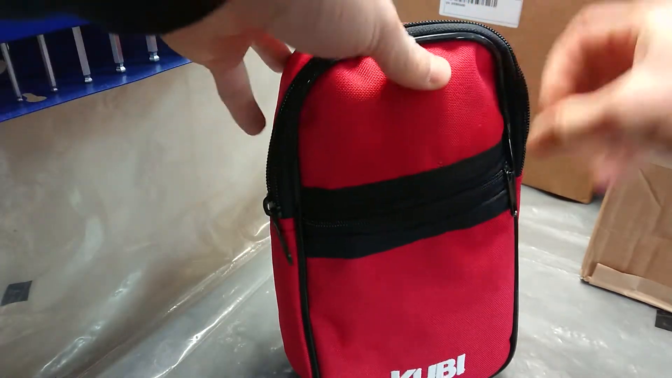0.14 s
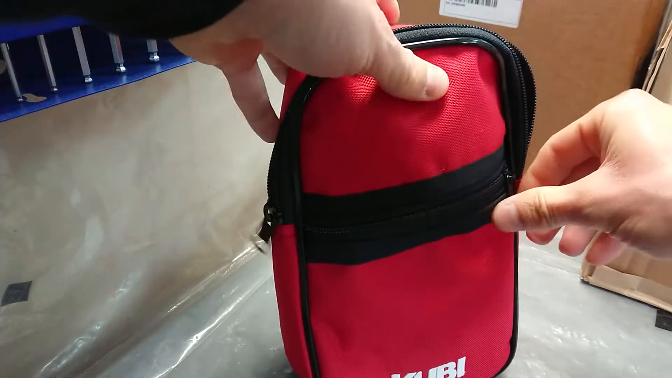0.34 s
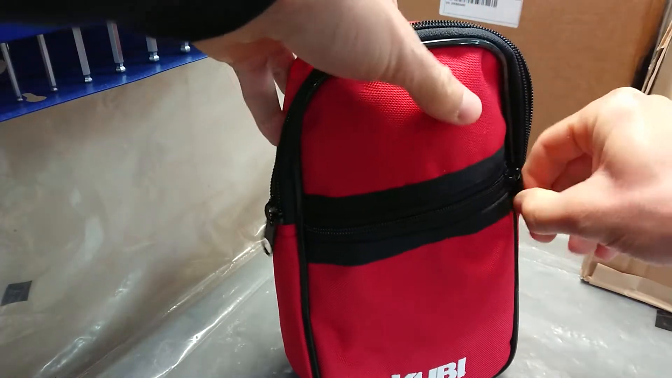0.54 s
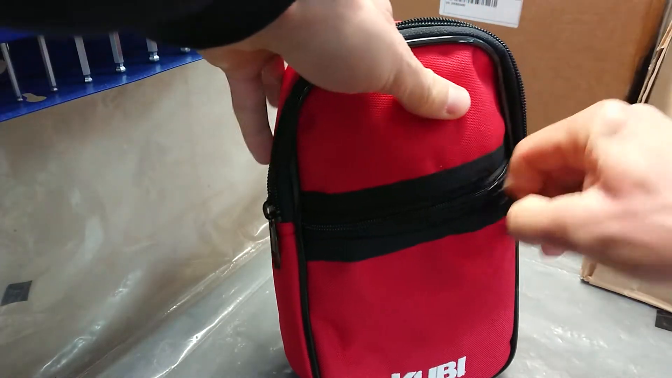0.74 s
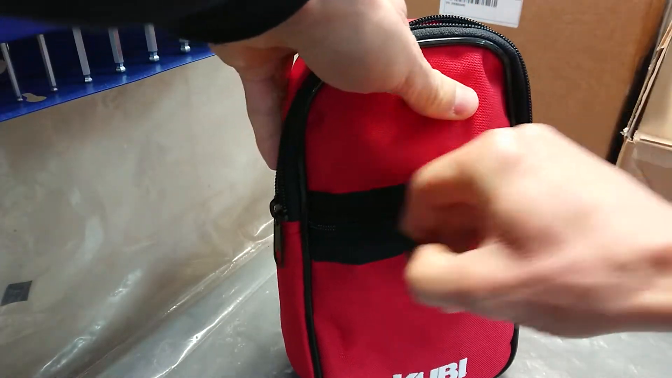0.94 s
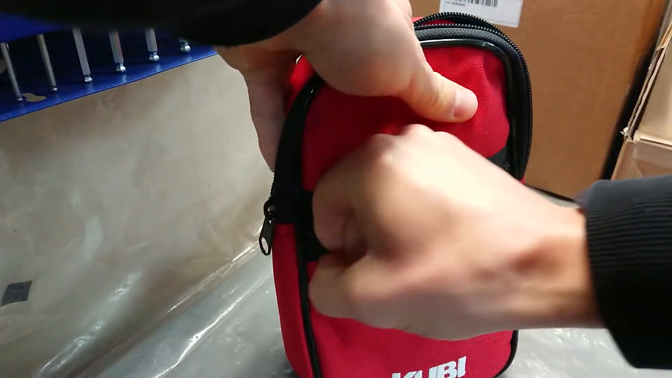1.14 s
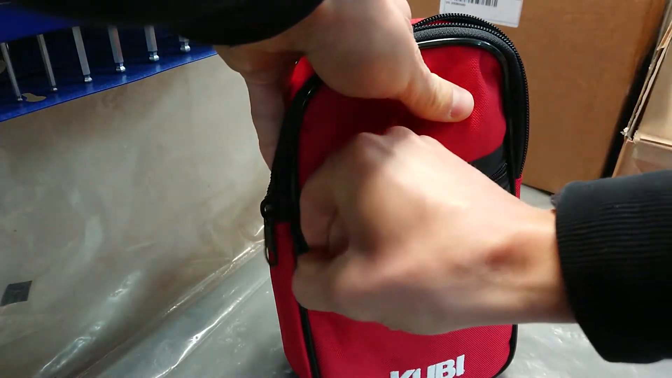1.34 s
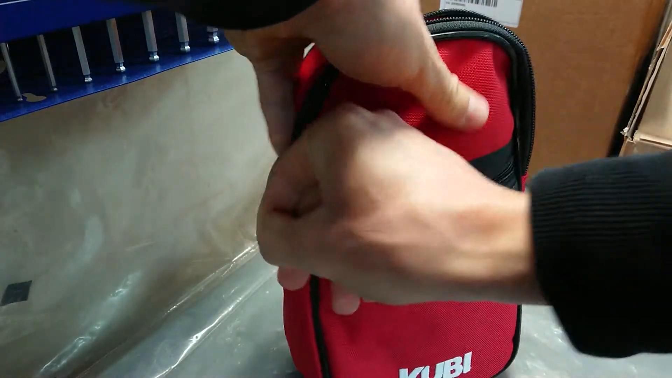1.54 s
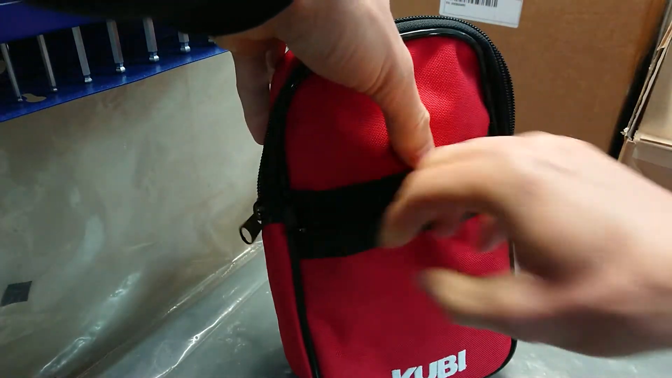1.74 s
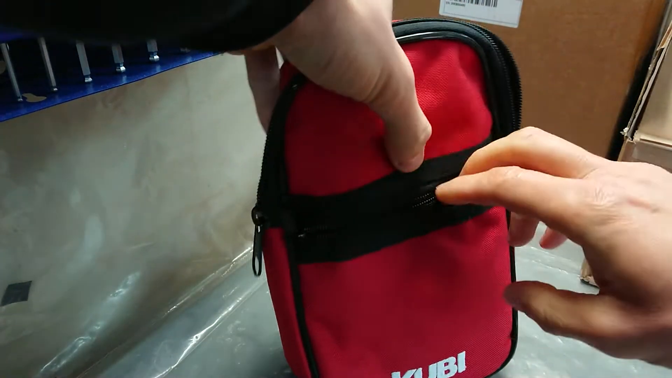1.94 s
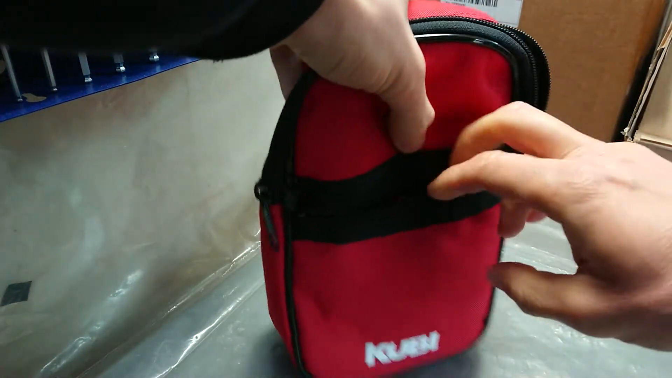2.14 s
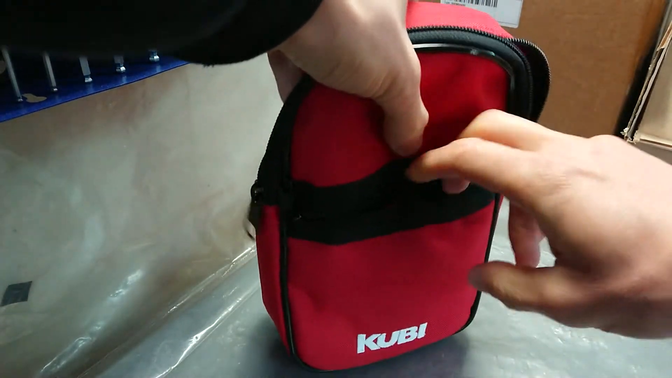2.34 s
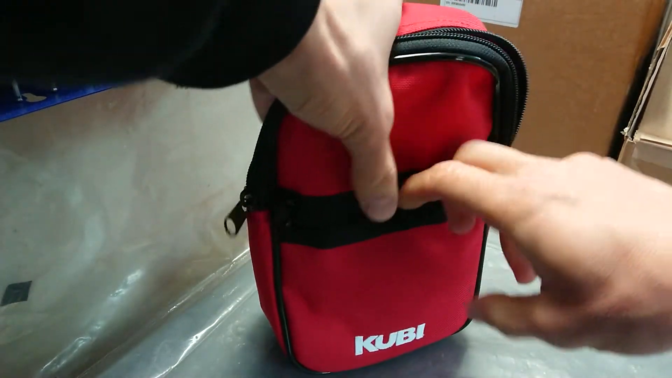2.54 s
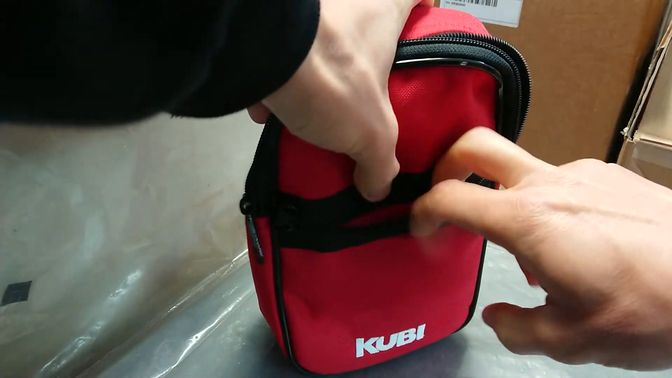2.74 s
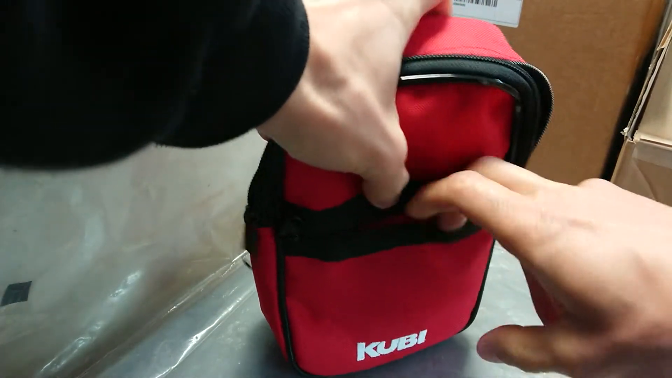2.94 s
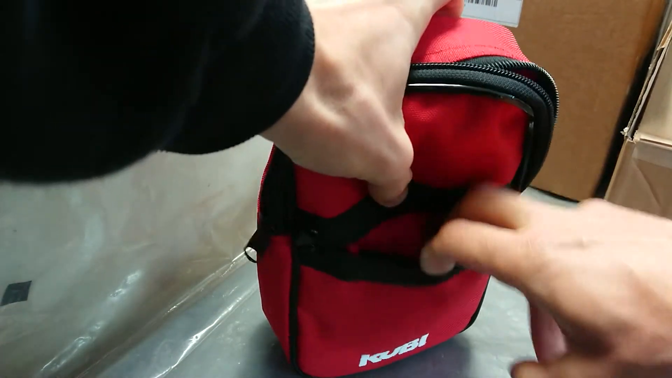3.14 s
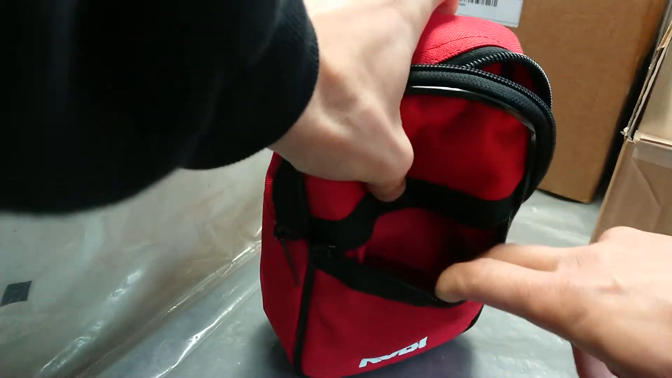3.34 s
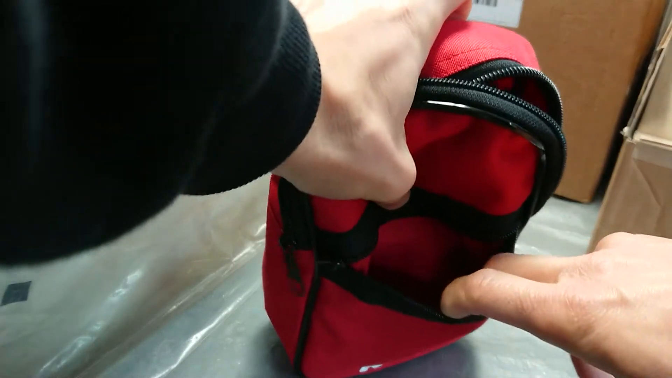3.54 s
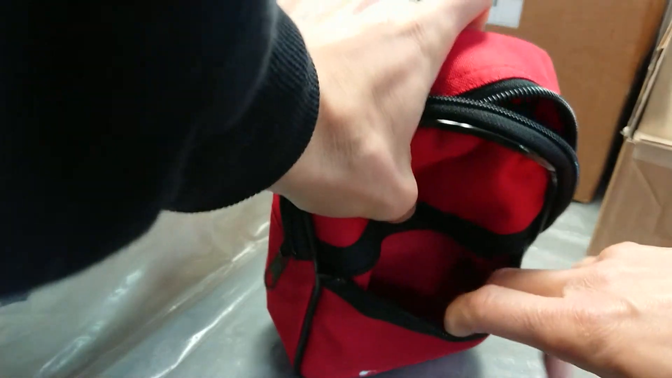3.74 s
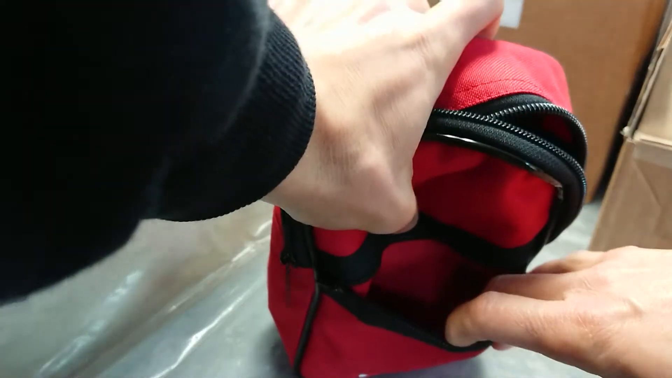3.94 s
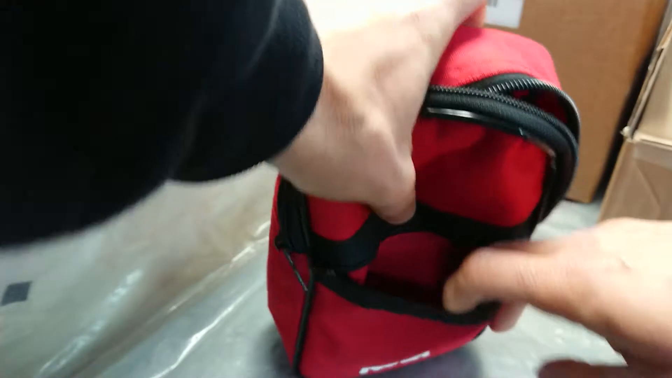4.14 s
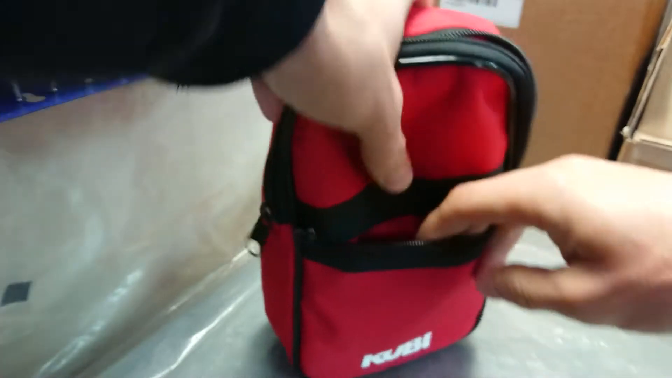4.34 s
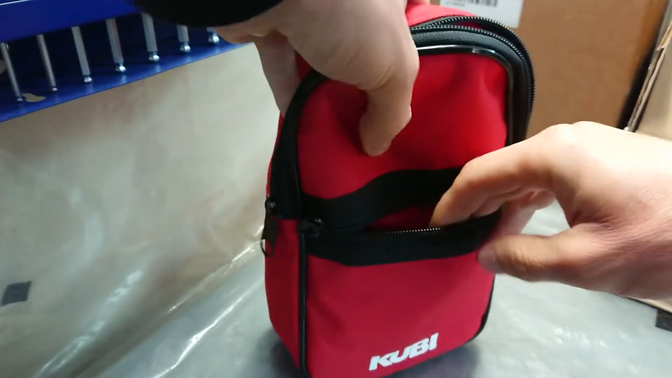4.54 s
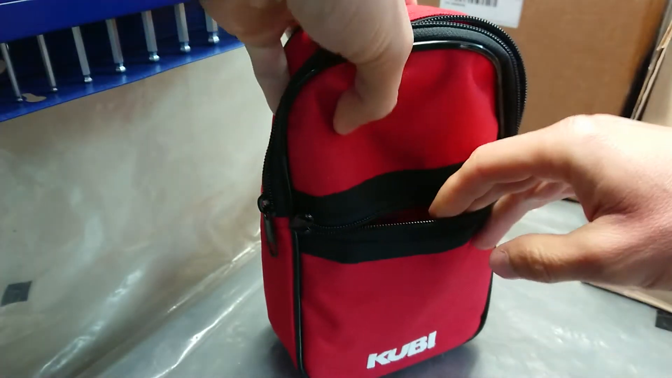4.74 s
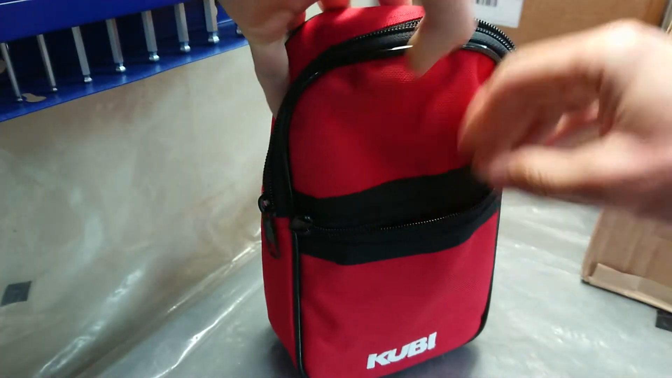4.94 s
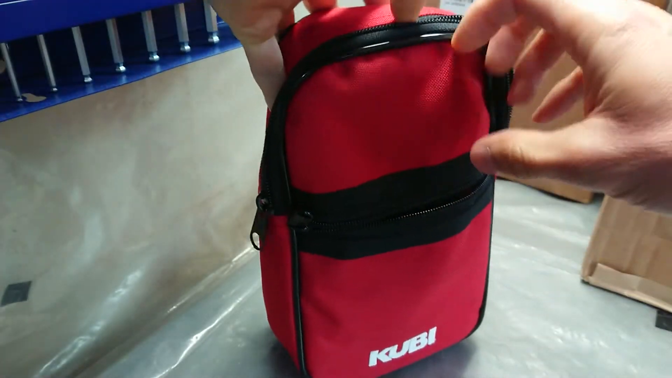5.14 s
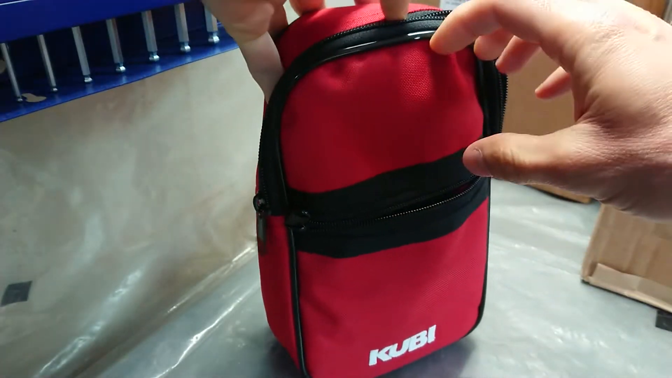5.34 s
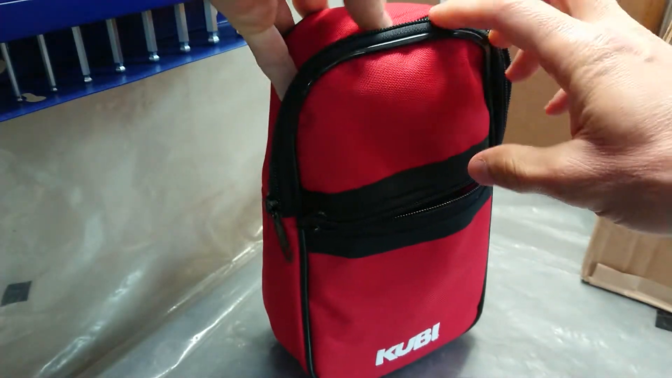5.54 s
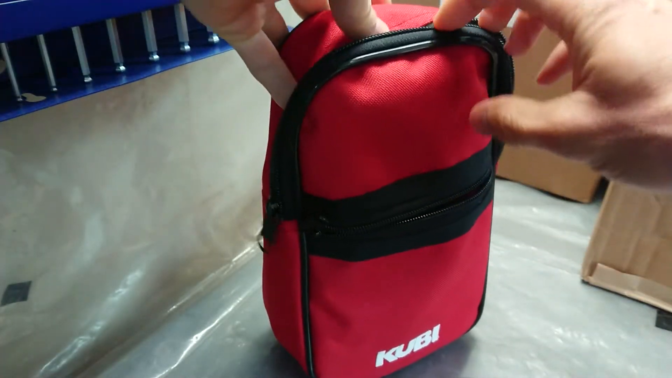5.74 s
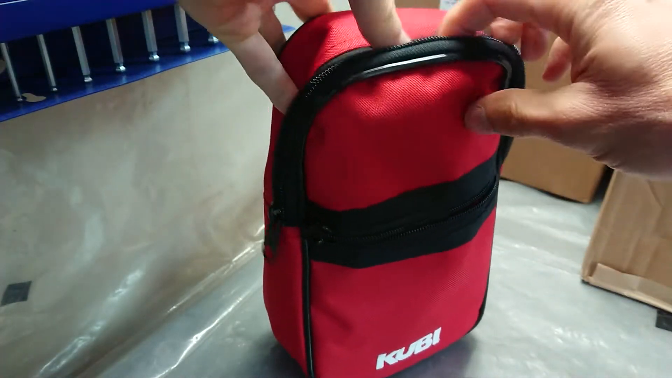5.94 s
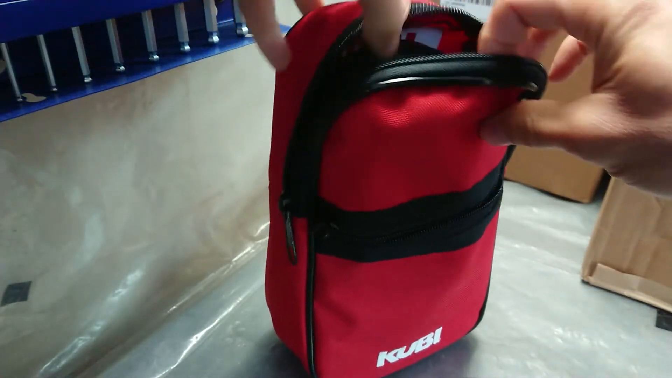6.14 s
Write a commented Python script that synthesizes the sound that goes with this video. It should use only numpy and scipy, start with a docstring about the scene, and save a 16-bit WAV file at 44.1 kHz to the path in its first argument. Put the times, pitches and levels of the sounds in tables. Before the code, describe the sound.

Close by, in a quiet small-sounding room with a low steady murmur, a hand brushes stiff nylon at 0 s, with a tiny tick and soft bump before 0.3 s and faint rustles to 0.7. At about 0.72 s a zip starts with a small snap and runs open until 1.25, a dense, bright rasp over a hollow drumming of taut cloth, slowing to separate ticks at the end. Around 1.46 s comes the loudest event: a tight cluster of metallic clacks with a very short bright ring and a dull thump, then small tab clinks to 1.6. Light rustling leads to busy handling from 2.1 to 3.5 s: swishes, creaks, crisp snaps and soft bumps, a strong snap near 3.04. It quiets around 3.6-4.1, then gentle swishing continues to 5, followed by sparse touches, a faint tick, and light brushing and a thin rub after 6 s.

```python
"""The front zip of a small nylon pouch is pulled open in one run, close by on a bench: each tooth ticks,
scrapes and drums on the cloth panel. The metal slider and its tab then clink at the end of the track, as
decaying tones with a burst of noise. Fingers spread the pocket: shaped noise makes the stiff cloth swish and
creak, cracks with a crumble of noise make it snap, and short pushes bump the pouch softly in a quiet room."""
import sys
import numpy as np
from scipy import signal
from scipy.fft import rfft, irfft, next_fast_len
from scipy.io import wavfile
from scipy.ndimage import uniform_filter1d

SR = 44100
rng = np.random.default_rng(int(sys.argv[2]) if len(sys.argv) > 2 else 0)


def dump_mix(stems):
    """Bounce the given channels to the path in sys.argv[1] as a 16-bit WAV at rate SR."""
    frames = np.atleast_2d(stems).T  # one column per channel
    limited = np.clip(frames, -1, 1)  # hard clip at full scale
    pcm = np.round(limited * 32767).astype(np.int16)
    wavfile.write(sys.argv[1], SR, pcm)


N = 272979
T = np.arange(N) / SR  # time of every sample, in seconds

# Snaps of stiff cloth, zip teeth and tab; each also kicks the pouch. Each row: time in seconds, reference
# peak level in dB, treble in dB against that level, time to die away by 60 dB in seconds.
SNAPS = [(0.109, -46.5, -9, 0.025), (.723, -35, -24, .014), (0.738, -31, -16, 0.014),
         (1.17, -38.5, -3, 0.01), (1.342, -33.5, -12.5, 0.0058), (1.486, -22, -25, 0.017),
         (1.893, -39.5, -2.5, 0.029), (2.171, -27, -15, 0.019), (2.225, -30, -2, 0.045),
         (2.378, -42, -2, 0.029), (2.461, -30.5, -9, 0.048), (2.506, -42, -3, 0.022),
         (2.556, -33.5, -4.5, 0.028), (2.709, -27, -22, 0.024), (2.795, -30, -7, 0.039),
         (2.91, -28.5, -9.5, 0.041), (3.035, -20, -19, 0.0069), (3.047, -32, -12, 0.026),
         (3.182, -29.5, -27, 0.017), (3.244, -28, -15.5, 0.018), (3.352, -27, -17.5, 0.023),
         (3.496, -37, -14, 0.03), (3.709, -34, -17.5, 0.012), (3.84, -37, -14.5, 0.012),
         (4.135, -44.5, -29, 0.021), (4.198, -37, -12, 0.015), (4.274, -41.5, -23, 0.022),
         (4.369, -36.5, -8.5, 0.039), (4.63, -41.5, -29, 0.03), (5.183, -39.5, -6, 0.0081),
         (5.465, -40, -19, 0.0049), (5.987, -40, -13, .04)]


def undb(db):
    """Turn decibels into a gain."""
    return 10 ** (np.asarray(db) / 20)


def unit(x):
    """Scale a sound to an rms of 1."""
    return x / np.sqrt(np.mean(x ** 2))


def curves(table):
    """Draw each column of a table as a control curve, sample by sample."""
    seconds, *columns = np.transpose(table)
    return [np.interp(T, seconds, column) for column in columns]


def colour(x, points):
    """Shape the spectrum through (Hz, dB) points with a filter that never answers ahead of its input."""
    size = next_fast_len(x.shape[-1] + 2048, real=True)
    hz, db = np.transpose(points)
    bins = np.fft.rfftfreq(size, 1 / SR)
    gain = undb(np.interp(np.log(bins + 1), np.log(hz), db))
    # folding the cepstrum gives the filter its minimum phase
    cepstrum = irfft(np.log(gain), size)
    cepstrum[1:size // 2] *= 2
    cepstrum[size // 2 + 1:] = 0
    response = np.exp(rfft(cepstrum))
    return irfft(rfft(x, size) * response, size)[..., :x.shape[-1]]


def noise(count, split_hz=900):
    """Make white noise at two ports: alike in the bass, unrelated in the treble."""
    mid, side = rng.standard_normal((2, count))
    side = signal.sosfilt(signal.butter(1, split_hz, "high", fs=SR, output="sos"), side)
    return unit(np.array([mid + side, mid - side]))


def walk(rate):
    """Wander smoothly at random, with this many knots per second and a spread near 1."""
    knots = rng.standard_normal(4096)
    return 1.2 * np.interp(T * rate, np.arange(len(knots)), knots)


def ring(modes, t, spread=0):
    """Sum the decaying tones of a struck object; spread (0-1) scatters their starting phases."""
    tones = 0
    for hz, t60, db in modes:
        phase = 2 * np.pi * (hz * t + spread * rng.random())
        tones = tones + undb(db - 60 * t / t60) * np.cos(phase)
    return tones


def resonate(x, hz, q):
    """Pass a sound through one broad resonance with gain 1 at its centre."""
    return signal.lfilter(*signal.iirpeak(min(hz, SR / 3), max(q, 1), fs=SR), x)


def fade(t, t60):
    """Decay exponentially, by 60 dB in t60 seconds."""
    return np.exp(-np.log(1000) * t / max(t60, 1e-3))


def add(out, s, sound, db):
    """Place a sound at a time in seconds with a given peak level."""
    start = int(s * SR)
    part = sound[..., :N - start] * undb(db) / np.abs(sound).max()
    out[:, start:start + part.shape[-1]] += part


def even(x, seconds=0.035):
    """Hold the short-term rms near 1, so that a level curve can play the sound."""
    power = uniform_filter1d(np.mean(np.atleast_2d(x) ** 2, axis=0), int(seconds * SR))
    return x / np.sqrt(np.abs(power) + 1e-3 * power.max())


def zipper(jitter=.07, scatter_db=2.5, tooth_t60=0.021, scrape=0.31, tick=2.4,
           slow_hz=130, soft_hz=190, soft_db=6):
    """Each parting tooth ticks, scrapes and plucks the panel; the tape's resonances sink as the zip opens."""
    # Slider speed. Each row: time in seconds, average teeth per second.
    slider = [(.722, 74.4), (.745, 100), (.76, 208), (.8, 266), (.87, 207), (.99, 228), (1.11, 102),
              (1.16, 86), (1.19, 39), (1.24, 35)]
    # Pull on the zip. Each row: time in seconds, tooth rasp level in dB, panel drumming level in dB.
    pull = [(0.725, -56.5, -48.5), (0.753, -42.5, -38.5), (0.829, -47, -50.5), (0.989, -47, -50.5),
            (1.041, -48.5, -41.5), (1.097, -49.5, -43.5), (1.195, -63, -44), (1.245, -59.5, -55.5),
            (1.25, -52.5, -62)]
    # Colour of the rasp. Each row: frequency in Hz, gain in dB.
    rasp_colour = [(400, 2.5), (600, -27.5), (750, -5.5), (1100, -6), (1400, -8), (2000, -10.5),
                   (2600, -9.5), (3300, -10.5), (4200, -12.5), (7200, -15), (8700, -15.5), (12000, -14.5),
                   (14700, -15), (16000, -28)]
    # Resonances of the zip chain and its tape. Each row: frequency in Hz, sharpness Q, gain in dB.
    chain = [(787, 9.8, 2.5), (1460, 5.9, -4), (1940, 6.4, 2.5), (3340, 10, -5)]
    # Taut front panel. Each row: frequency in Hz, time to fall 60 dB in seconds, relative level in dB.
    panel_modes = [(110, 0.07, 1.5), (209, 0.054, 8.5), (308, 0.031, 13), (465, 0.0088, -31)]
    # the rasp runs along the opened tape and back, a longer way with every tooth
    tape_s, tape_s_per_tooth, tape_db = .0023, .000012, -9.5

    rate, = curves(slider)
    rasp_level, panel_level = curves(pull)
    moving = (T > slider[0][0]) & (T < slider[-1][0])
    teeth_passed = np.cumsum(moving * rate * (1 + jitter * walk(180))) / SR
    teeth = np.diff(np.ceil(teeth_passed), prepend=0) * undb(scatter_db * rng.standard_normal(N))

    t = T[:SR // 8]
    contact = signal.fftconvolve(teeth, fade(t, tooth_t60))[:N] + scrape * moving
    rasp = colour(contact * noise(N) + tick * teeth, rasp_colour)
    rasp = rasp + sum(undb(db) * resonate(rasp, hz, q) for hz, q, db in chain)
    back = T - tape_s - tape_s_per_tooth * teeth_passed
    rasp = rasp + undb(tape_db) * np.array([np.interp(back, T, port) for port in rasp])

    # slow teeth let go gently and sound mostly the panel's lowest mode
    gentle = 1 / (1 + (rate / slow_hz) ** 4)
    soft = signal.sosfilt(signal.butter(1, soft_hz, fs=SR, output="sos"), teeth * gentle)
    pluck = teeth * (1 - gentle) + undb(soft_db) * soft
    panel = signal.fftconvolve(pluck, -ring(panel_modes, t))[:N]
    panel = signal.sosfilt(signal.butter(2, 520, fs=SR, output="sos"), panel)
    return even(rasp) * undb(rasp_level) + even(panel) * undb(panel_level)


def clinks():
    """The slider ticks on its way, then hits its stop with the tab; each knock excites the modes differently."""
    # Slider and tab knocking together. Each row: time in seconds, clash peak level in dB,
    # tab ring peak level in dB, time for the clash to fall 60 dB in seconds.
    knocks = [(0.8703, -31.5, -62, 0.0045), (1.457, -22.5, -67.5, 0.04), (1.466, -11.5, -46, 0.022),
              (1.4702, -18, -52, 0.029), (1.474, -16, -59, 0.047), (1.49, -33, -60, .025),
              (1.522, -31, -72, 0.056), (1.5745, -36.5, -40.5, .045)]
    # Slider's metal tones. Each row: frequency in Hz, time to fall 60 dB in seconds, average level in dB.
    slider_modes = [(4156, .25, -31), (5778, .05, -4), (5810, .45, -31), (6019, .3, -30), (6845, .05, -7),
                    (7097, .06, -7), (7520, .2, -22), (8672, .05, -10), (9957, .06, -5), (10102, .12, 0),
                    (10615, .07, -8), (10732, .07, -6), (12540, .28, -17), (14037, .05, -2),
                    (14160, .06, -4)]
    # Pull tab's tones. Each row: frequency in Hz, time to fall 60 dB in seconds, average level in dB.
    tab_modes = [(4958, .035, 0), (5790, .25, -26), (14160, .16, -1)]
    # Colour of the clash noise. Each row: frequency in Hz, gain in dB.
    clash_colour = [(500, -6), (1000, -24.5), (1500, -6), (3000, -17), (4500, -10.5), (6500, -11),
                    (8500, -7.5), (10500, -2), (12500, -10.5), (14200, 5), (15500, -29)]
    # the slider rings as loud as its clash at full_ring_db; softer knocks lose ring_slope dB of ring per dB
    full_ring_db, ring_slope = -12, 1.42

    out, t = np.zeros((2, N)), T[:SR // 2]
    for s, peak_db, tab_db, t60 in knocks:
        add(out, s, colour(noise(len(t)) * fade(t, t60), clash_colour), peak_db)
        slider_db = full_ring_db + ring_slope * (peak_db - full_ring_db)
        for modes, tone_db in ((slider_modes, slider_db), (tab_modes, tab_db)):
            ports = []
            for _ in range(2):
                scattered = [(hz, life, db + rng.standard_normal()) for hz, life, db in modes]
                ports.append(ring(scattered, t, spread=1))
            add(out, s, np.array(ports), tone_db)
    return out


def snap(s, db, treble_db, hz, t60, crack=3.2, edge_crack=1.5, grain_db=4, body_db=-3.0, edge_db=3,
         fold_q=3, fold=.8, build_s=0.00042, reach=1.9):
    """A crack and a brief crumble ring a resonance, as a fold does; gives body and edge as (s, sound, dB)."""
    # Colour of the snap's body. Each row: frequency in Hz, gain in dB.
    body_colour = [(300, -2), (600, -10.5), (770, -1), (1000, -8.5), (1350, -1.5), (1700, -10), (2100, -10),
                   (2440, -5.5), (2800, -11), (3230, -5.5), (4500, -11.5), (9000, -21)]
    # Colour of its bright edge. Each row: frequency in Hz, gain in dB.
    edge_colour = [(1500, -11.5), (3000, -5), (6000, 4), (7500, 7), (9000, 0), (14000, 4.5), (16000, -12)]

    t = T[:SR // 10]
    knots = t[::30]
    grains = undb(grain_db * np.interp(t, knots, rng.standard_normal(len(knots))))
    crumble = noise(len(t)) * grains * fade(t, t60) * (1 - np.exp(-t / build_s))
    force = crumble + crack * (t == 0)
    body = colour(force, body_colour) + fold * resonate(force, hz, fold_q)
    # a large, low-pitched fold moves too slowly to radiate treble
    soft = signal.butter(2, np.clip(reach * hz, 2000, SR / 3), fs=SR, output="sos")
    edge = colour(crumble + edge_crack * (t == 0), edge_colour)
    return [(s + 0.001021, signal.sosfilt(soft, body), db + body_db),
            (s + 0.000997, edge, db + treble_db + edge_db)]


def snaps(flex_level):
    """Cloth, teeth and tab snap and tick; small creases give way at random, louder in harder flexing."""
    # Bright ticks of loose zip teeth and of the pull tab. Each row: time in seconds,
    # reference peak level in dB.
    ticks = [(1.25, -35.5), (1.574, -28.5), (2.281, -42), (2.82, -33.5), (2.89, -33), (2.952, -29)]
    tick_hz, tick_treble_db, tick_t60_s = 5400, -9.5, 0.023
    fold_hz, fold_spread_octaves = 1400, 0.27
    # crease level is against the flexing cloth
    creases_per_s, crease_db, crease_spread_db = 15, 9.5, 4
    crease_treble_db, crease_t60_s = -9, 0.0094

    def pitch(z):
        """Scatter the resonance from snap to snap."""
        return fold_hz * 2 ** (fold_spread_octaves * z)

    events = [(s, db, treble_db, pitch(rng.standard_normal()), t60) for s, db, treble_db, t60 in SNAPS]
    events += [(s, db, tick_treble_db, tick_hz, tick_t60_s) for s, db in ticks]
    for i in np.flatnonzero(rng.random(N - SR // 100) < creases_per_s / SR):
        size, tension = rng.standard_normal(2)
        level = flex_level[i] + crease_db + crease_spread_db * size
        events.append((T[i], level, crease_treble_db, pitch(tension), crease_t60_s))

    out = np.zeros((2, N))
    for event in events:
        for s, sound, db in snap(*event):
            add(out, s, sound, db)
    return out


def hands(unsteady_hz=18, unsteady_db=2):
    """Each stroke swells, holds and dies away over a resting grip; gives sliding and flexing levels in dB."""
    # Strokes over the cloth: finding the tab, letting go, working into the pocket, spreading it,
    # drawing the fingers out, a new grip. Each row: start in seconds, end in seconds,
    # average sliding level in dB, average flexing level in dB.
    strokes = [(-.03, 0.063, -53.5, -58.5), (0.376, 0.494, -62, -58), (0.558, 0.694, -66, -66.5),
               (0.684, .75, -70, -50), (1.33, 1.437, -74.5, -59), (1.491, 1.693, -62, -63),
               (1.734, 2.12, -64, -60.5), (2.098, 2.215, -51.5, -57), (2.22, 2.337, -64, -57),
               (2.373, 2.496, -61, -58.5), (2.51, 2.636, -55.5, -53), (2.624, 2.876, -59, -62),
               (2.91, 3.126, -56, -57), (3.148, 3.255, -53, -47.5), (3.263, 3.466, -64.5, -49.5),
               (3.487, 3.59, -72, -52.5), (4.137, 4.302, -67, -57), (4.237, 4.453, -60, -61.5),
               (4.409, 4.796, -56, -66.5), (4.791, 4.974, -55.5, -61), (4.987, 5.067, -58, -68),
               (5.126, 5.191, -59.5, -61), (5.24, 5.312, -66.5, -77), (5.42, 5.963, -71.5, -70),
               (5.869, 5.918, -63.5, -60), (5.976, 6.012, -59.5, -52), (6.057, 6.24, -58.5, -58)]
    grip_slide_db, grip_flex_db = -76.5, -70.5
    # each swell and release takes a least time plus a share of the stroke's length
    attack_s, release_s, ease_share = 0.017, 0.024, .14

    def ease(t, seconds):
        """Rise smoothly from 0 to 1 around t = 0."""
        return (1 + np.tanh(2 * t / seconds)) / 2

    slide_power, flex_power = undb(grip_slide_db) ** 2, undb(grip_flex_db) ** 2
    for start, end, slide_db, flex_db in strokes:
        slack = ease_share * (end - start)
        shape = ease(T - start, attack_s + slack) * ease(end - T, release_s + slack)
        slide_power = slide_power + (shape * undb(slide_db)) ** 2
        flex_power = flex_power + (shape * undb(flex_db)) ** 2
    return 10 * np.log10([slide_power, flex_power]) + unsteady_db * walk(unsteady_hz)


def cloth(slide_level, flex_level, swish_db=-0.5, creak_db=-8.5, flex_db=-3, creak_share=0.29,
          weave_db=1.5, catch_db=4.0, flutter_db=3, slips_per_s=110, crackle=12, fizz=7):
    """Skin hisses over the weave, fibres catch and slip, panels flex; creaks take both sliding and flexing."""
    # Colour of the swish. Each row: frequency in Hz, gain in dB.
    swish_colour = [(700, -21.5), (2000, -7), (4000, -5.5), (6000, -7.5), (7300, -1.5), (8800, -5),
                    (11000, 3), (13000, -5), (14500, -1), (16000, -34.5)]
    # Colour of the creak. Each row: frequency in Hz, gain in dB.
    creak_colour = [(350, -8.5), (620, -9.5), (760, 10), (950, -5), (1300, 2.5), (1800, -2.5), (2400, -5),
                    (3300, -10), (5000, -17), (9000, -43)]
    # Colour of the flexing panels. Each row: frequency in Hz, gain in dB.
    flex_colour = [(35, -29.5), (60, 6.5), (110, 1), (220, -0.5), (340, 2), (450, -8.5), (700, -15.5),
                   (1200, -44)]

    creak_level = creak_share * slide_level + (1 - creak_share) * flex_level
    catch = walk(260)
    weave = (catch + walk(43)) / 2
    slips = (rng.random(N) < slips_per_s / SR) * rng.standard_normal(N)
    swish = unit(colour(noise(N) * undb(weave_db * weave) + fizz * slips, swish_colour))
    creak = unit(colour(noise(N) * undb(catch_db * catch) + crackle * slips, creak_colour))
    flex = unit(colour(noise(N) * undb(flutter_db * catch), flex_colour))
    out = swish * undb(slide_level + swish_db)
    out = out + creak * undb(creak_level + creak_db)
    return out + flex * undb(flex_level + flex_db)


def drags(waver=0.11, overtone=0.58, grit=0.31, top=3.9):
    """A dry fingertip sticks and slips: a short, coarse, half-pitched rub."""
    # Fingertips dragging over cloth and piping. Each row: start in seconds, end in seconds,
    # average stick-slip rate in Hz, level of the pitched part in dB at the middle.
    rubs = [(0.688, 0.714, 340, -53), (1.81, 1.852, 341, -52.5), (2.023, 2.062, 400, -56.5),
            (5.044, 5.074, 330, -58), (6.132, 6.224, 1099, -54.5)]
    out = np.zeros((2, N))
    for start, end, hz, db in rubs:
        slip = np.sin(2 * np.pi * np.cumsum(hz * (1 + waver * walk(hz / 3))) / SR)
        band = signal.butter(1, [hz * 0.79, hz * top], "band", fs=SR, output="sos")
        tone = unit(signal.sosfilt(band, slip + overtone * slip ** 2))
        rub = tone + grit * unit(signal.sosfilt(band, noise(N)))
        swell = np.sin(np.pi * np.clip((T - start) / (end - start), 0, 1))
        out += rub * undb(db) * swell
    return out


def bumps():
    """A short push sets the pouch wobbling; a quicker one reaches its higher modes."""
    # Soft bumps of the pouch, from hands, snapping folds and the slider hitting its stop.
    # Each row: time in seconds, peak level in dB, quickness of the push in Hz.
    pushes = [(0.099, -45, 70.6), (0.295, -41, 100), (1.186, -31.5, 112), (1.455, -23, 135),
              (1.892, -34, 324), (2.227, -28.5, 269), (2.291, -41, 65.6), (2.379, -35, 127),
              (2.394, -34, 62), (2.469, -37.5, 55), (2.51, -36, 100), (2.555, -29, 260), (2.599, -30.5, 93),
              (2.71, -30.5, 83.5), (2.799, -24, 100), (3.044, -37.5, 70), (5.05, -48, 87.7),
              (5.159, -41.5, 235), (6.006, -41.5, 67)]
    # Whole pouch on the bench. Each row: frequency in Hz, time to fall 60 dB in seconds, relative level in dB.
    pouch_modes = [(56.7, 0.34, -12), (100, 0.051, -1.5), (183.6, 0.034, 0), (296, 0.027, 10),
                   (505, 0.038, -1)]
    # kick from each snap: level against the snap's reference level, quickness of the push
    recoil_db, recoil_hz = -12.5, 260

    out, body = np.zeros((2, N)), ring(pouch_modes, T[:SR // 3])
    recoils = [(s, db + recoil_db, recoil_hz) for s, db, _, _ in SNAPS]
    for s, db, hz in list(pushes) + recoils:
        push = np.hanning(int(SR / (2 * hz)) + 3)
        add(out, s, signal.fftconvolve(body, push), db)
    return out


def reflections(x, t60=0.27, wet_db=-18, sway=0.051):
    """Near surfaces return the treble with delays that shift as the pouch moves; a faint tail follows."""
    # Bench, side wall, boxes. Each row: average delay in seconds, gain in dB.
    surfaces = [(.0019, -37.5), (.0034, -16.5), (.0052, -18.5)]
    bright = signal.sosfilt(signal.butter(1, 700, "high", fs=SR, output="sos"), x)
    early = 0
    for delay, db in surfaces:
        back = T - delay * (1 + sway * walk(0.95))
        early = early + undb(db) * np.array([np.interp(back, T, port) for port in bright])
    t = T[:SR // 2]
    tail_colour = [(100, -17), (500, 2), (5000, -8.0), (15000, -12)]  # (Hz, dB)
    tail = colour(noise(len(t)) * fade(t, t60) * (t > .003), tail_colour)
    tail = tail / np.sqrt(np.sum(tail ** 2) / 2)
    return early + undb(wet_db) * signal.fftconvolve(x, tail, axes=1)[:, :N]


def room_murmur(level_db=-60.5):
    """The quiet room is steady noise, strongest in the bass."""
    # Colour of the room. Each row: frequency in Hz, gain in dB.
    room_colour = [(25, -32), (45, 11), (80, 8), (160, -5.5), (220, -18), (350, -13), (520, -3),
                   (800, -18.5), (1000, -18.5), (1300, -17.5), (2000, -39), (3200, -44.5), (5500, -59.5),
                   (11000, -42), (16000, -39.5)]
    return unit(colour(noise(N), room_colour)) * undb(level_db)


def scene():
    """Sum the pouch's sounds, their reflections and a low room murmur."""
    slide_level, flex_level = hands()
    pouch = zipper() + clinks() + snaps(flex_level)
    pouch = pouch + cloth(slide_level, flex_level) + drags() + bumps()
    return pouch + reflections(pouch) + room_murmur()


def record(dry, lag_samples=2.5, bass_hz=47, top_hz=15700):
    """The right port hears later and with its own colour; deep bass and the top are cut."""
    # Right port, shaded in the middle treble. Each row: frequency in Hz, right minus left in dB.
    ports = [(60, -5.5), (200, -6.5), (380, -10.5), (530, 7), (700, -2.5), (1000, -13), (1500, -17.5),
             (3500, -15.5), (4500, -23.5), (5800, -46), (7200, -34.5), (8500, -5), (10000, -2), (12000, 12),
             (15000, 1)]
    hz, lean_db = np.transpose(ports)
    f = np.fft.rfftfreq(N, 1 / SR)
    right = undb(np.interp(np.log(f + 1), np.log(hz), lean_db))
    lag = np.exp(-2j * np.pi * f * lag_samples / SR)
    # the two ports' gains average 1 at every frequency
    gains = 2 * np.array([np.ones_like(right), right * lag]) / (1 + right)
    heard = irfft(rfft(dry) * gains, N)
    heard = signal.sosfilt(signal.butter(4, bass_hz, "high", fs=SR, output="sos"), heard)
    return signal.sosfilt(signal.ellip(10, .2, 80, top_hz, fs=SR, output="sos"), heard)


dry = scene()
out = record(dry)
dump_mix(out)
```